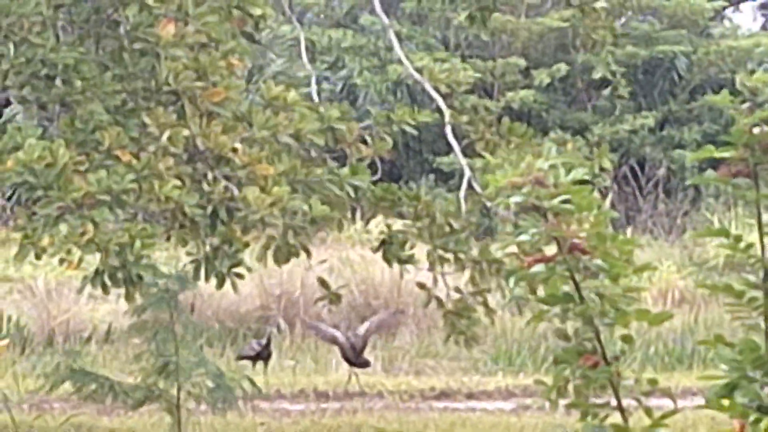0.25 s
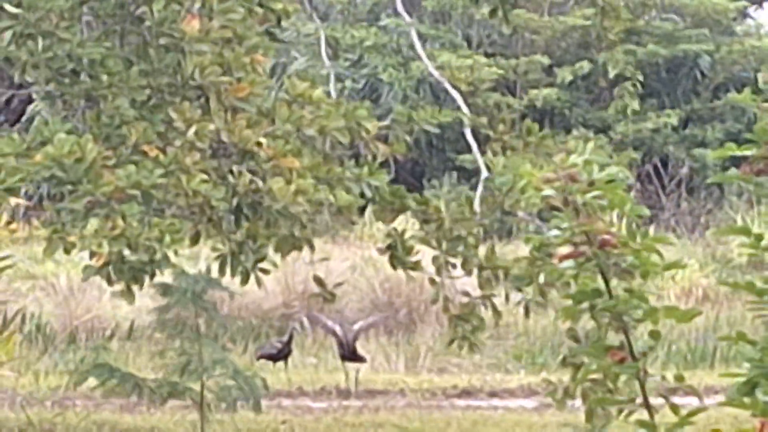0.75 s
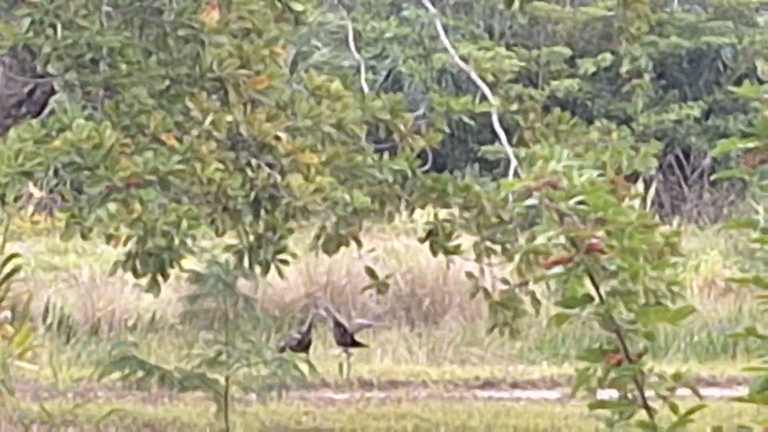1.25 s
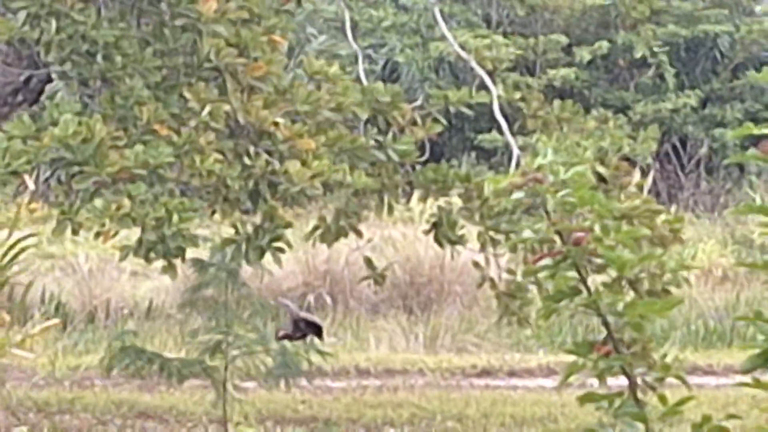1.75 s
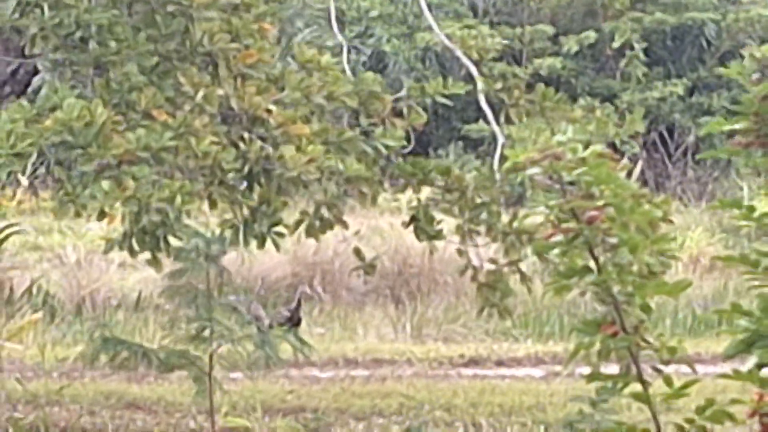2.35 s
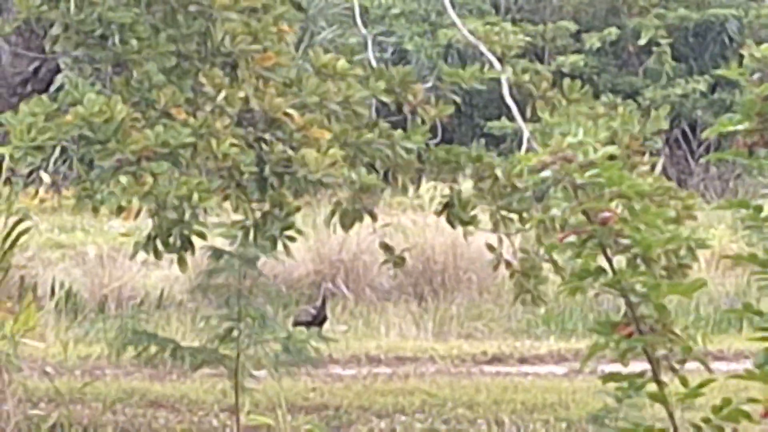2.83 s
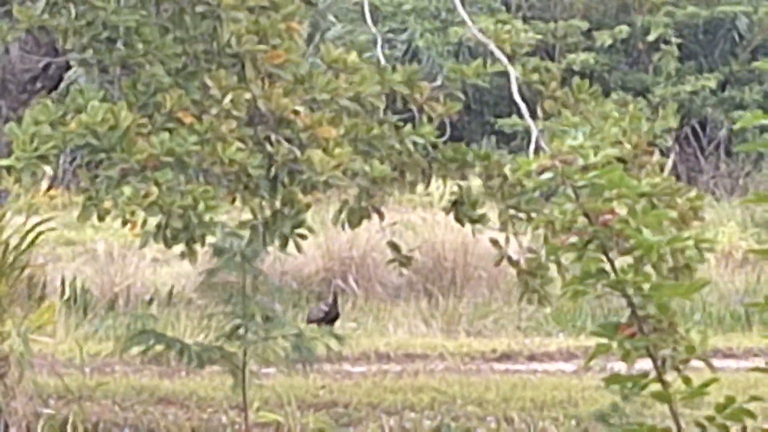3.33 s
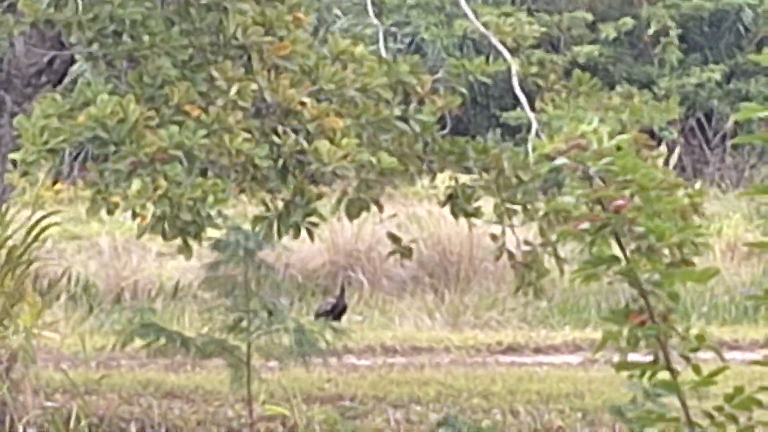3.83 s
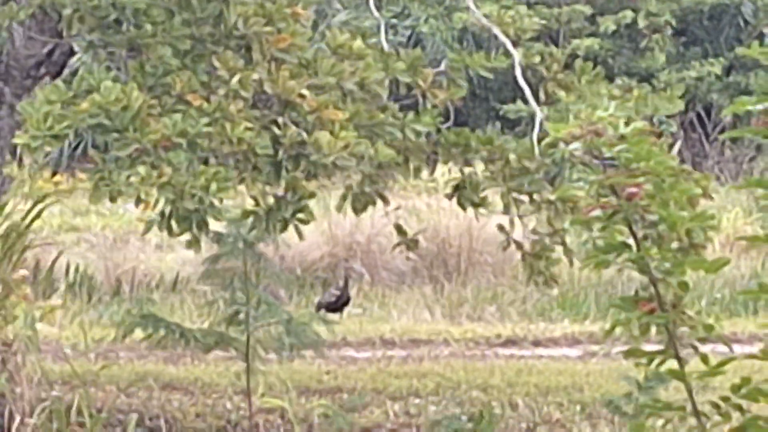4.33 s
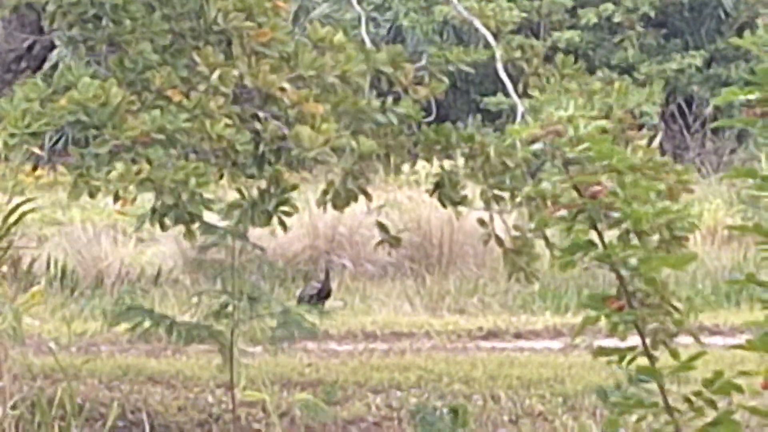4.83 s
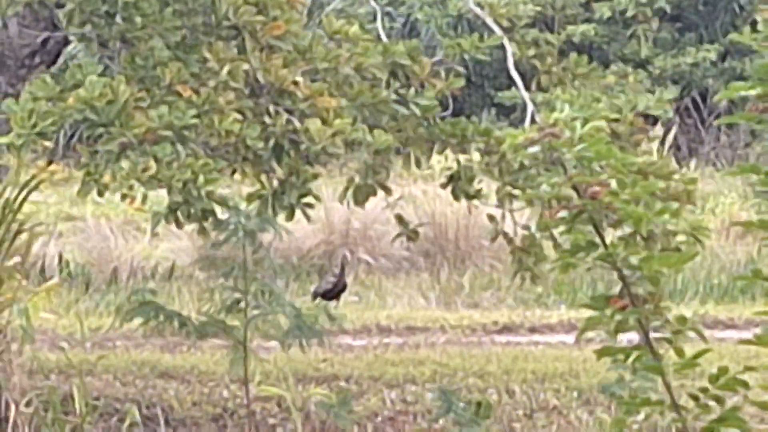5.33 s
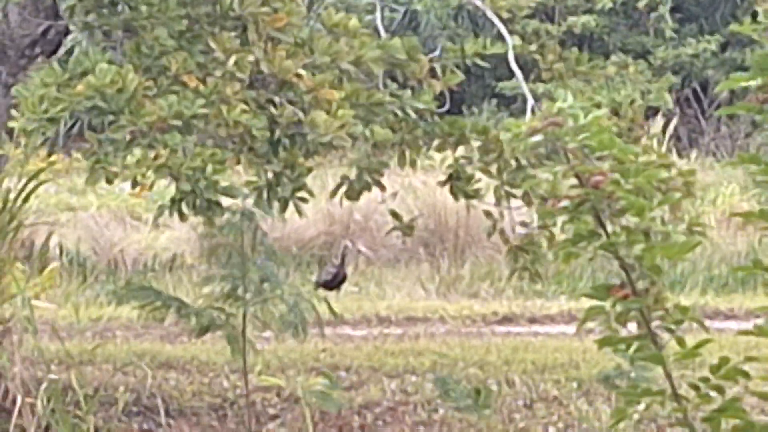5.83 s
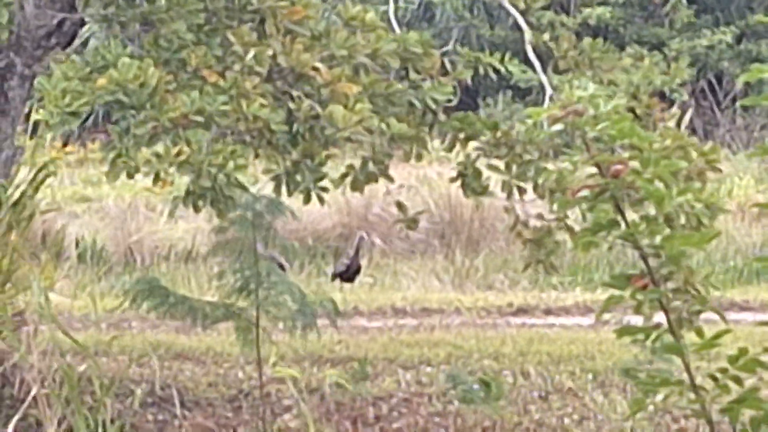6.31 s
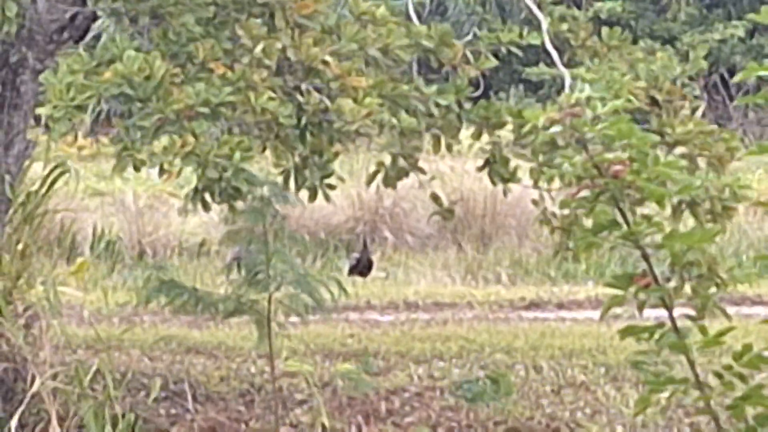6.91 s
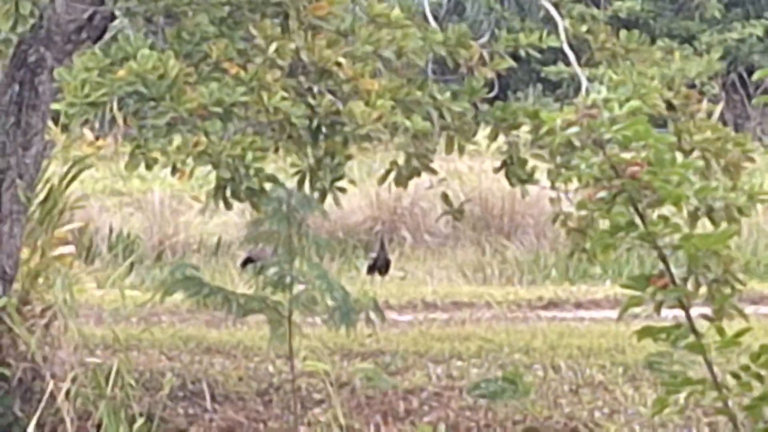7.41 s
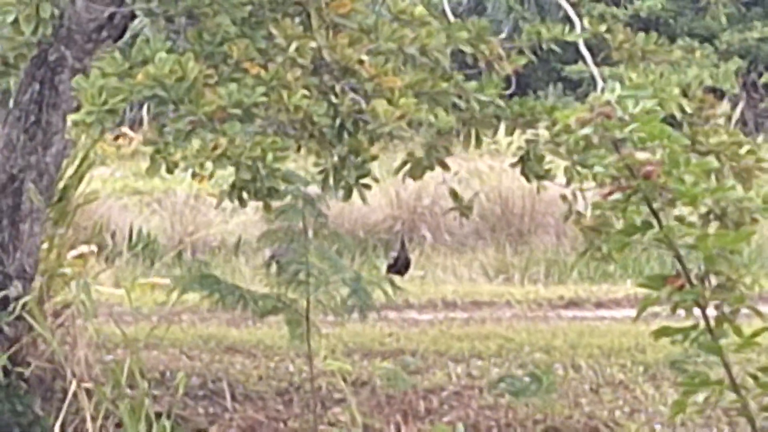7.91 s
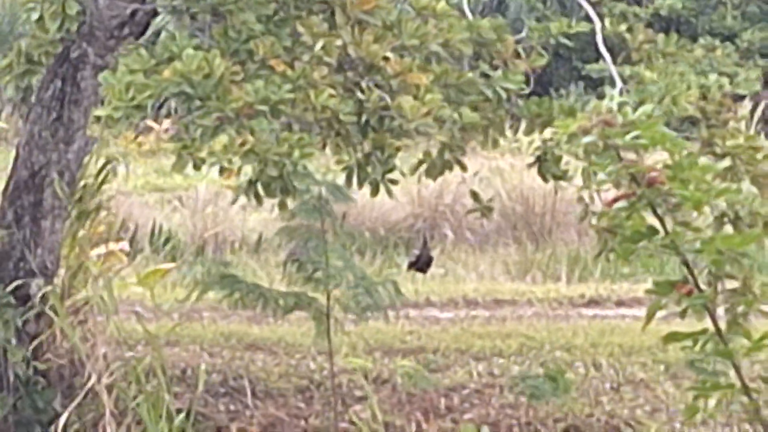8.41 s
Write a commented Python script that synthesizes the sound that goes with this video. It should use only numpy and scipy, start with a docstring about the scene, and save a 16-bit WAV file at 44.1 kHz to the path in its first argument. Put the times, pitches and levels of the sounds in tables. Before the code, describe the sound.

Two wading birds quarrel across a grassy clearing, one yelping sharply about every 0.6 seconds, the other rattling dryly, over wind rumble and distant traffic.

```python
"""Wind thumps and far traffic rumble come first; then two limpkins quarrel across a grassy clearing.
One repeats a short arched yelp, rough, then clear, then falling, and once cracks into a squawk: harmonics
filtered by a throat. The other answers with dry rattles, pulses ringing resonators, and one harmonic scream.
A small bird chips in gliding sines. Trees scatter the calls; leaves hiss as shaped noise; engines hum and
tyres whine as narrow bands of noise."""
import sys
import numpy as np
from scipy import signal
from scipy.fft import rfft, irfft
from scipy.io import wavfile
from scipy.ndimage import uniform_filter1d

SR = 44100
rng = np.random.default_rng(int(sys.argv[2]) if len(sys.argv) > 2 else 0)


def wav_record(signal):
    """Record a signal, one row per channel, as 16-bit PCM in the file named by sys.argv[1]."""
    frames = np.transpose(np.atleast_2d(signal))
    bounded = np.clip(frames, -1, 1)
    # unit amplitude maps onto the largest positive 16-bit level
    quanta = np.round(bounded * 32767).astype(np.int16)
    wavfile.write(sys.argv[1], SR, quanta)


N = 381906
TIME = np.arange(N) / SR
BINS_HZ = np.maximum(np.arange(N // 2 + 1) * SR / N, 1)


def from_db(db):
    """Decibels to amplitude gain: 20 dB is a factor of ten."""
    return 10 ** (np.asarray(db) / 20)


def rms_one(x):
    """Normalise to unit mean-square power."""
    return x / np.sqrt(np.mean(x ** 2) + 1e-20)


def in_time(rows, t):
    """Linear interpolation of every column of a curve at times t."""
    s, *columns = np.transpose(rows)
    return [np.interp(t, s, column) for column in columns]


def at_hz(points, hz):
    """Interpolation of every column of a spectrum on a log-frequency axis."""
    f, *columns = np.transpose(points)
    return np.squeeze([np.interp(np.log(hz), np.log(f), column) for column in columns])


def drift(rate_hz, size):
    """Low-pass filtering: two equal poles turn white noise into slow chance variation of RMS 1."""
    r = np.exp(-2 * np.pi * rate_hz / SR)
    run_in = int(SR / rate_hz)
    white = rng.standard_normal(size + run_in)
    return rms_one(signal.lfilter([1], [1, -2 * r, r * r], white)[run_in:])


def narrow_noise(phase, width_hz):
    """Quadrature modulation: two slow noises on sine and cosine make a unit-power band around a gliding tone."""
    in_phase = drift(width_hz, len(phase)) * np.sin(phase)
    quadrature = drift(width_hz, len(phase)) * np.cos(phase)
    return in_phase + quadrature


def resonate(x, hz, width_hz):
    """Damped resonance: a pole pair whose radius sets the bandwidth, with a peak gain of about 1."""
    r = np.exp(-np.pi * width_hz / SR)
    zeros = np.array([1, 0, -1]) * (1 - r * r) / 2
    poles = [1, -2 * r * np.cos(2 * np.pi * hz / SR), r * r]
    return signal.lfilter(zeros, poles, x)


def add(track, start_s, sound):
    """Superposition: sum a sound into a track, no earlier than its start and no later than its end."""
    i = max(int(start_s * SR), 0)
    track[i:i + len(sound)] += sound[:max(N - i, 0)]


def stereo_noise(colour):
    """Spatial coherence: mid and side noise, left and right most alike at 300-650 Hz, least in the treble."""
    # left-right likeness: f/Hz, coherence
    likeness = [(30, .25), (70, .35), (150, .62), (300, .78), (650, .79), (1300, .55), (2600, .2),
                (6000, .1), (15000, 0)]
    mid, side = rfft(rng.standard_normal((2, N)))
    alike = at_hz(likeness, BINS_HZ)
    pair = np.sqrt(1 + alike) * mid + np.sqrt(1 - alike) * side * [[1], [-1]]
    # steep skirts outside the first and last frequency of the colour
    low_hz, high_hz = colour[0][0], colour[-1][0]
    skirts = 1 / (1 + (low_hz / BINS_HZ) ** 8 + (BINS_HZ / high_hz) ** 8)
    return rms_one(irfft(pair * from_db(at_hz(colour, BINS_HZ)) * skirts, N))


def yelp_course(s, lead_s, clear_s, fall_s, entry_hz, held_hz, clear_db, rough_db, catch_db, crack, bright):
    """Register break: a rough lead-in catches, jumps into an arched clear note and drops to a growl."""
    # stages of every yelp: f/(held f), added level/dB, added rasp 0-1, added brightness/(dB per octave)
    onset = (.885, 1, .72, 4.5)
    lead_in = (.895, .5, .2, 3)
    catch = (.925, -1, .3, 3)  # pitch share first of the held, then of the entry pitch
    break_in = (1, -0.75, -0.018, 0.7)  # pitch share of the entry pitch
    hold = (1, -.6, .03, 0)
    push = (.972, 1, .08, 1.5)
    break_off = (.94, -.5, .2, 0)
    drop = (.875, 0.71, 0.1, -0.43)
    growl = (.71, 0.44, 0.83, 2.3)
    settle_share, catch_share, drop_share = 0.496, 0.665, 0.33  # shares of the lead-in, lead-in and fall
    catch_s, break_off_s = 0.0049, 0.00574  # longest jump into the clear note; time to give way to the fall
    after_catch_s = lead_s * (1 - catch_share)
    end = s + clear_s
    stages = [
        (s - lead_s, onset, held_hz, rough_db, crack, 0),
        (s - lead_s * (1 - settle_share), lead_in, held_hz, rough_db, crack, 0),
        (s - after_catch_s, catch, held_hz, rough_db - catch_db, 0, 0),
        (s - min(catch_s, after_catch_s / 2), catch, entry_hz, rough_db - catch_db, 0, 0),
        (s, break_in, entry_hz, clear_db, crack, bright),
        (s + clear_s / 3, hold, held_hz, clear_db, 0, bright),
        (s + clear_s * 2 / 3, hold, held_hz, clear_db, 0, bright),
        (end, push, held_hz, clear_db, 0, bright),
        (end + break_off_s, break_off, held_hz, rough_db, 0, 0),
        (end + fall_s * drop_share, drop, held_hz, rough_db, 0, 0),
        (end + fall_s, growl, held_hz, rough_db, 0, 0),
    ]
    return [(t, hz * share, db + lift_db, rasp + more_rasp, tilt + more_tilt)
            for t, (share, lift_db, rasp, tilt), hz, db, more_rasp, more_tilt in stages]


def cry(rows, throat, fundamental_db=0, shrill_hz=10000, shrill_db=0, edge_s=.005,
        pivot_hz=3000, tilt_top_hz=4300, loud_db=-34, bite=0.18, top_gain=0.067,
        beak_hz=4100, beak_width_hz=400, beak_gain=1.0, half_open=1.0, shrill_width_hz=1500,
        flutter_db=2.5, tremor=0.0023, air_db=-19, growl_hz=240, growl_depth=1.05):
    """Source-filter voice: syrinx harmonics sweep through a throat; rasp makes pitch and strength irregular."""
    first, last = rows[0][0], rows[-1][0]
    t = np.arange(first - edge_s, last + 2 * edge_s, 1 / SR)
    pitch, level_db, rasp, bright = uniform_filter1d(np.array(in_time(rows, t)), size=120, axis=1)
    gate = np.interp(t, [first - edge_s, first, last, last + 2 * edge_s], [0, 1, 1, 0])
    # rasp shakes the pitch and smears each harmonic into a band of noise
    chaos = np.clip(rasp, 0, 1) ** 1.5
    jitter = (tremor + .06 * chaos) * drift(330, len(t))
    smear, smear_hz = 2.4 * chaos, 500
    phase = 2 * np.pi * np.cumsum(pitch * (1 + jitter)) / SR
    # a harsh voice also comes in uneven bursts; the Bessel term holds their mean power
    growl_rate = growl_hz * (1 + 0.248 * drift(growl_hz, len(t)))
    beat = np.cos(2 * np.pi * np.cumsum(growl_rate) / SR)
    depth = growl_depth * chaos
    gate = gate * np.exp(depth * beat) / np.sqrt(np.i0(2 * depth))
    source = np.zeros(len(t))
    for k in range(1, 14):
        hz = k * pitch
        colour_db = bright * np.log2(np.minimum(hz, tilt_top_hz) / pivot_hz) + fundamental_db * (k == 1)
        # a bright call comes from a wide beak, which rings at one resonance
        opening = bright - half_open
        colour_db += beak_gain * (1 - chaos) * opening * np.exp(-((hz - beak_hz) / beak_width_hz) ** 2)
        # the top harmonics need a hard push and a wide beak, and fade first
        top_slope = bite * (level_db - loud_db) + top_gain * opening
        colour_db += top_slope * np.log2(np.maximum(hz / tilt_top_hz, 1))
        # the clear voice has a shrill resonance
        colour_db += shrill_db * (1 - chaos) * np.exp(-((hz - shrill_hz) / shrill_width_hz) ** 2)
        # the balance between harmonics wavers, and the higher ones carry more rushing air
        colour_db += flutter_db * drift(56.4, len(t))
        noisy = smear + from_db(air_db) * hz / pivot_hz
        tone = np.sqrt(2) * np.sin(k * phase)
        partial = (tone + noisy * narrow_noise(k * phase, smear_hz)) / np.hypot(1, noisy)
        source += from_db(colour_db) * partial * (hz < SR / 2)
    throat_gain = from_db(at_hz(throat, np.maximum(np.arange(SR // 2 + 1), 1)))
    voice = irfft(rfft(source * gate * from_db(level_db), SR) * throat_gain, SR)
    return t[0], voice[:len(t)]


def yelps_and_squawk():
    """Source-filter calls of the first bird: arched yelps with a register break, and one harsh squawk."""
    # yelps: break into the clear note t/s, lead-in/s, clear note/s, fall/s, entry f/Hz, held f/Hz,
    # clear drive level/dB, rough drive level/dB, cut at the catch/dB, rasp added to lead-in and break 0-1,
    # brightness/(dB per octave), lift of the fundamental/dB, shrill resonance f/Hz, its lift/dB
    yelps = [ (.509, 0.012, 0.042, 0.044, 1390, 1399, -32.5, -43, -3, 0.07, 3, -1.5, 10100, 5.5),
             (1.225, 0.055, 0.038, 0.036, 1430, 1428, -34, -41.5, 6, 0, 1, -2, 12900, 8),
             (1.874, 0.045, 0.04, 0.045, 1459, 1439, -30, -39.5, 2, 0.03, 1, -4.5, 13200, 9),
             (2.528, 0.029, 0.052, 0.045, 1404, 1404, -34, -40, -7, 0, 5, -2.5, 12900, 12.5),
             (3.125, 0.021, 0.058, 0.038, 1365, 1413, -30, -38.5, -3, 0, 0, -7.5, 10000, 1),
             (3.738, 0.042, 0.043, 0.04, 1420, 1401, -28, -36.5, 15, 0.05, -1, -8, 12600, 13),
             (4.351, 0.031, 0.038, 0.042, 1340, 1403, -32.5, -41.5, -5, 0.04, 2.5, -3, 8700, 7.5),
             (4.946, .034, .033, 0.054, 1355, 1395, -34, -41.5, 1, 0, 4, -0.5, 9700, 2),
             (5.556, 0.037, 0.027, 0.053, 1360, 1377, -30, -38, 1.5, .01, 6.5, -9.5, 13100, 11.5),
             (6.234, 0.048, 0.03, 0.053, 1368, 1373, -32.5, -39, 10, 0, 7, -4, 9900, 5),
             (7.797, 0.0061, 0.047, 0.034, 1314, 1275, -40, -39.5, 0, 0.5, -5, -10, 9500, 6), ]
    # throat and beak response: f/Hz, gain/dB
    yelp_throat = [(500, -27), (950, 4.5), (1230, 1), (1420, 2.5), (2100, -12), (2550, -8), (2770, -15.5),
                   (2860, -11), (3100, -13), (3650, -5), (3920, -18), (4180, -7.5), (4750, -14.5),
                   (5400, -13), (6150, -18.5), (6760, -7), (7100, -12.5), (7650, -14.5), (8400, -35),
                   (9700, -26), (13000, -38), (16000, -31)]
    # a grunt and a gap before a long harsh fall:
    # t/s, f/Hz, drive level/dB, rasp 0-1, brightness/(dB per octave)
    squawk_rows = [(6.898, 1206, -42, 0.76, 7), (6.903, 1297, -35.5, 0.7, 3), (6.916, 1245, -42, 0.9, 5),
                   (6.923, 1198, -64, 0.5, 3), (6.961, 1344, -64, 0.5, 3), (6.965, 1387, -29.5, 0.56, 7),
                   (6.974, 1316, -36.5, 0.47, 6), (6.986, 1290, -42, .12, 4), (7.001, 1277, -37, 0.1, 2.5),
                   (7.015, 1232, -31.5, .03, 3.5), (7.025, 1180, -40, 0.1, 5), (7.031, 1067, -36, 0.1, 5),
                   (7.039, 1026, -41, .7, -2), (7.048, 997, -34, 0.86, 3), (7.058, 910, -53, 1, 3)]
    # throat and beak response: f/Hz, gain/dB
    squawk_throat = [(500, -22), (1250, -3.5), (2000, -6), (2550, -7), (2950, -18), (3650, -2),
                     (3930, -15.5), (4230, -3), (4700, -16), (5150, -9), (5800, -13), (6300, -17.5),
                     (6900, -8), (7500, -18), (8400, -28), (9700, -24.5), (13000, -40), (16000, -34)]
    caller = np.zeros(N)
    for *course, fundamental_db, shrill_hz, shrill_db in yelps:
        add(caller, *cry(yelp_course(*course), yelp_throat, fundamental_db, shrill_hz, shrill_db))
    add(caller, *cry(squawk_rows, squawk_throat))
    return caller


def rattle_note(db, throat_hz, upper_db, pulse_hz=345, slowing=.2, unevenness=.11, snap_db=2.0,
                breath=0.034, width_hz=500, first_share=0.77, rise_s=0.012, release_s=0.016,
                beak_opens_s=0.0064, low_hz=1120, mode_wander=0.029, mode_vary_db=2):
    """Impulse excitation: uneven, slowing snaps of the syrinx ring the throat; louder croaks last longer."""
    # throat resonances: f/Hz, width of one of two passes/Hz, gain/dB; f and gain vary by croak
    rattle_modes = [(1260, 130, 2.5), (2020, 200, -9), (2450, 200, -14), (3280, 340, -8), (3680, 280, -7),
                    (4100, 260, -7), (6000, 2200, -29)]
    length_s = .029 * 2 ** ((db + 34) / 44.5)  # 29 ms at -34 dB, doubling for every 44.5 dB more
    t = np.arange(int(length_s * SR)) / SR
    rate = pulse_hz * rng.uniform(.78, 1.2) * (1 - slowing * (t / length_s - .5))
    cycles = np.cumsum(rate * (1 + unevenness * drift(pulse_hz, len(t)))) / SR
    # one snap each time the running count passes a whole number
    snaps = np.diff(np.floor(cycles), prepend=-1) * from_db(snap_db * rng.standard_normal(len(t)))
    source = snaps + breath * rng.standard_normal(len(t))
    # the main resonance acts twice, which leaves a deep valley above it
    voice = resonate(resonate(source, throat_hz, width_hz), throat_hz, width_hz)
    # the other resonances come in as the beak opens
    beak = np.minimum(t / beak_opens_s, 1)
    for hz, width, mode_db in rattle_modes:
        hz = hz * (1 + mode_wander * rng.standard_normal())
        mode_db = mode_db + mode_vary_db * rng.standard_normal()
        ringing = resonate(resonate(source, hz, width), hz, width)
        voice = voice + beak * from_db(mode_db + upper_db) * ringing
    voice = signal.sosfilt(signal.butter(6, low_hz, "high", fs=SR, output="sos"), voice)
    # the first snap is nearly at full strength
    swell = np.interp(t, [0, rise_s], [first_share, 1])
    release = np.minimum((length_s - t) / release_s, 1)
    return from_db(db) * rms_one(voice) * swell * release


def rattles_and_scream():
    """Pulsed and harmonic excitation of the rival's throat: runs of dry croaks and one scream."""
    # croaks: t/s, level before swell and release/dB, throat resonance f/Hz, upper resonances gain/dB
    croaks = [ (1.046, -46, 1600, -7), (1.094, -40, 1650, -10), (1.139, -35, 1600, -5),
              (1.266, -31, 1770, -0.5), (1.292, -38, 1610, 5), (1.321, -44, 1400, 9),
              (2.214, -45, 1820, -14), (2.255, -38, 1750, -8), (2.298, -35, 1700, -5),
              (2.341, -33, 1720, -3), (2.38, -37.5, 1540, -5), (2.419, -46, 1450, 6),
              (3.218, -39.5, 1730, 7), (3.26, -37.5, 1730, 0), (3.301, -34, 1610, -3.5),
              (3.344, -36, 1520, -4), (3.39, -45, 1450, 4), (4.19, -48, 1740, -5), (4.231, -43, 1660, -12),
              (4.271, -41, 1690, -5), (4.308, -36.5, 1530, -9), (4.322, -37, 1800, -4),
              (4.352, -36, 1650, -10), (4.39, -40.5, 1500, 4), (5.293, -44, 1700, -1),
              (5.329, -42, 1700, 2), (5.368, -36.5, 1500, 4), (5.405, -40.5, 1480, 1),
              (5.446, -46, 1400, 9), (6.344, -44.5, 1590, 6), (6.389, -41, 1650, 4),
              (6.427, -35.5, 1430, 1), (6.467, -38, 1460, 9), (6.511, -46, 1400, 7), (7.21, -45, 1540, -9),
              (7.252, -42, 1630, -4), (7.291, -37.5, 1690, -0.5), (7.33, -30.5, 1560, -1.5),
              (7.372, -32.5, 1540, -0.5), (7.415, -40, 1330, -5), (7.46, -47.5, 1350, 11),
              (8.171, -44, 1640, -11), (8.218, -44.5, 1650, -5), (8.263, -39, 1530, -7),
              (8.302, -36, 1530, -7.5), (8.342, -39, 1480, -7), (8.38, -45.5, 1400, -2), ]
    # scream: t/s, f/Hz, drive level/dB, rasp 0-1, brightness/(dB per octave)
    scream_rows = [(1.174, 2000, -43, .4, 7), (1.188, 1803, -36, .35, 8), (1.196, 1704, -27.5, 0.32, -15),
                   (1.207, 1600, -24.5, 0.3, 3), (1.216, 1553, -38, 0.25, -8), (1.231, 1597, -44, .3, -6),
                   (1.238, 1626, -24, 0.1, 1), (1.249, 1557, -26, 0.2, 2), (1.257, 1434, -25, 0.15, -16),
                   (1.263, 1370, -35, 0.3, -4)]
    # throat and beak response: f/Hz, gain/dB
    scream_throat = [(500, -30), (1000, -20), (1650, -7.5), (1950, -12), (2400, -20), (3200, -8.5),
                     (4200, -22), (5200, -34), (9000, -43), (16000, -47)]
    rival = np.zeros(N)
    add(rival, *cry(scream_rows, scream_throat))
    for s, *croak in croaks:
        add(rival, s, rattle_note(*croak))
    return rival


def bush(x, scatter_db=-7, delay_s=.02, spread_s=0.011, centre_hz=1720, width_hz=450):
    """Multiple scattering: nearby branches return a dull, smeared copy that fills the gaps between croaks."""
    t = TIME[:SR // 10]
    response = rng.standard_normal(len(t)) * np.exp(-.5 * ((t - delay_s) / spread_s) ** 2)
    response = response / np.linalg.norm(response)
    return from_db(scatter_db) * signal.fftconvolve(resonate(x, centre_hz, width_hz), response)[:N]


def limpkins():
    """Superposition of both birds; only the rival's calls are scattered by a bush beside it."""
    rival = rattles_and_scream()
    return yelps_and_squawk() + rival + bush(rival)


def small_bird(waver=0.016, buzzy_hz=7800, fade_s=0.017):
    """Frequency modulation: gliding sines whose random waver grows with pitch, so low notes stay smooth."""
    # chips and whistles: t/s, length/s, start f/Hz, middle f/Hz, end f/Hz, level before fades/dB
    chips = [(1.462, .043, 7100, 7350, 7600, -56), (1.592, 0.037, 8050, 7720, 7400, -55),
             (3.266, 0.067, 7900, 7650, 7500, -49.5), (3.356, .05, 8600, 8000, 7500, -54),
             (5.225, .11, 2680, 2865, 2670, -56), (7.945, .11, 3640, 3600, 3510, -60),
             (8.552, .04, 8200, 7900, 7750, -58)]
    out = np.zeros(N)
    for s, length, *course_hz, db in chips:
        t = np.arange(int(length * SR)) / SR
        hz = np.polyval(np.polyfit([0, length / 2, length], course_hz, 2), t)
        hz = hz * (1 + waver * (hz / buzzy_hz) ** 2 * drift(300, len(t)))
        fade = np.minimum(np.minimum(t, length - t) / fade_s, 1)
        tone = np.sqrt(2) * np.sin(2 * np.pi * np.cumsum(hz) / SR)
        add(out, s, from_db(db) * fade * tone)
    return out


def clearing(x, near_db=-13, near_t60=0.28, faint_db=-19, faint_t60=0.18,
             echo_db=-23, echo_s=0.1, echo_spread_s=0.069):
    """Convolution: direct sound plus two decaying scatters and a smeared echo from the tree line."""
    # arrival at the two microphones: f/Hz, left-right level/dB, left phase lead/rad
    arrival = [(1100, 0, -.3), (1420, 0, .9), (2000, 0, .7), (2800, 5, -2.0), (3600, -1, -.8),
               (4200, -3, 1.0), (5500, 4, 2.3), (6900, 1, -1.0), (9700, -2, .5), (14000, -5, -1.5)]
    # colour of the scattered sound: f/Hz, gain/dB
    tree_colour = [(800, 16), (1400, 5), (2800, 5.5), (3600, 9), (4150, 7), (5500, 8), (7200, 0),
                   (10000, -16), (16000, -21)]
    balance_db, lead = at_hz(arrival, BINS_HZ)
    sides = np.array([[.5], [-.5]])
    direct = irfft(rfft(x) * from_db(sides * balance_db) * np.exp(1j * sides * lead), N)
    t = TIME[:SR]
    shapes = [
        (near_db, from_db(-60 * t / near_t60)),
        (faint_db, from_db(-60 * t / faint_t60)),
        (echo_db, np.exp(-.5 * ((t - echo_s) / echo_spread_s) ** 2)),
    ]
    response = np.zeros((2, SR))
    for db, shape in shapes:
        response += from_db(db) * shape / np.linalg.norm(shape) * rng.standard_normal((2, SR))
    coloured = irfft(rfft(x) * from_db(at_hz(tree_colour, BINS_HZ)), N)
    return direct + signal.fftconvolve(coloured[None], response, axes=1)[:, :N]


def buffets(low_hz=48, high_hz=125, shared=1.0):
    """Turbulent pressure: eddies thump the microphone ports, partly together and partly each on its own."""
    # buffets: centre t/s, length/s, level before the window/dB
    thumps = [(0.361, 0.19, -34.5), (0.521, 0.059, -26), (0.708, 0.13, -27), (0.817, 0.082, -27),
              (0.947, 0.059, -28), (1.628, 0.069, -27), (2.333, 0.078, -22.5), (2.774, 0.074, -29.5),
              (3.169, .16, -42), (4.138, 0.16, -33), (4.403, 0.1, -23.5), (4.956, 0.12, -36)]
    out = np.zeros((2, N))
    band = signal.butter(2, [low_hz, high_hz], "band", fs=SR, output="sos")
    for s, length, db in thumps:
        n = int(length * SR)
        both, *own = signal.sosfilt(band, rng.standard_normal((3, SR)))[:, -n:]
        for track, eddy in zip(out, own):
            add(track, s - length / 2, from_db(db) * np.hanning(n) * rms_one(shared * both + eddy))
    return out


def wind(lumps_db=3.0, lumps_hz=9):
    """Turbulent noise: a bass rumble whose level wavers at random, making it lumpy."""
    # level before the lumps: t/s, level/dB
    course = [(0, -33.5), (.9, -32.5), (1.2, -40.5), (2.0, -37), (2.6, -38), (3.0, -35.5), (3.2, -32),
              (3.7, -36), (3.95, -39), (4.3, -32.5), (4.8, -35.5), (6.2, -36), (7.2, -39.5), (8.66, -38)]
    # spectrum: f/Hz, relative density/dB
    colour = [(22, -15), (36, -8), (50, 2.5), (63, 1), (80, 3.5), (110, -2.5), (150, -7), (200, -11.5),
              (260, -15.5), (380, -20.5)]
    lumps_course_db = lumps_db * drift(lumps_hz, N)
    return from_db(in_time(course, TIME)[0] + lumps_course_db) * stereo_noise(colour)


def traffic(trim_db=-0.96, swell_db=0.91, swell_hz=3):
    """Incoherent sum of far sources: a coloured noise wash with a gently wavering level."""
    # level before trim and swell: t/s, level/dB
    course = [(0, -37.5), (.45, -35), (1.0, -37), (2.3, -39.5), (2.8, -38), (3.6, -37), (4.1, -41.5),
              (6.0, -40), (7.5, -42), (8.66, -43.5)]
    # spectrum: f/Hz, relative density/dB
    colour = [(160, 4), (250, 2.5), (340, -6), (420, -3.5), (510, 3.5), (660, 2), (800, -3.5), (1050, -4.5),
              (1400, -11.5), (1900, -15.5), (2600, -33.5), (4000, -30)]
    swell_course_db = swell_db * drift(swell_hz, N)
    return from_db(in_time(course, TIME)[0] + trim_db + swell_course_db) * stereo_noise(colour)


def vehicles(engine_width_hz=2.72, tyre_width_hz=25, fade_s=0.14, swell_db=10):
    """Narrow-band noise: engines hum in thin lines, tyres whine in broader ones; each swells, glides and fades."""
    # engine tones: start t/s (negative starts at 0), rise/s, fall/s, start f/Hz, end f/Hz, peak level/dB
    engine_tones = [(-0.1, 0.73, 0.6, 192, 190, -40), (3.5, 0.38, 0.957, 195.5, 180, -45),
                    (4.5, 1.5, 1.21, 190, 200, -43), (3.5, 3, 3.87, 123, 110, -44.5),
                    (2.5, 3, 6.7, 62.2, 62.6, -40), (0, 0.39, 12.9, 504, 504.6, -53.5)]
    # tyre whines: same columns
    tyre_whines = [(.15, 0.21, 0.456, 535, 517, -35.5), (0.62, 0.397, 1.2, 390, 475, -56),
                   (.1, 0.264, 0.6, 706, 740, -40.5), (0.87, 0.598, 1.1, 675, 640, -41.5),
                   (2.6, 1.2, 0.49, 635, 600, -46)]
    out = np.zeros(N)
    for tones, width_hz in [(engine_tones, engine_width_hz), (tyre_whines, tyre_width_hz)]:
        for s, rise_s, fall_s, start_hz, end_hz, peak_db in tones:
            t = np.arange(0, rise_s + fall_s, 1 / SR)
            hz = np.linspace(start_hz, end_hz, len(t))
            level_db = peak_db - swell_db * np.interp(t, [0, rise_s, t[-1]], [1, 0, 1])
            fade = np.minimum(np.minimum(t, t[-1] - t) / fade_s, 1)
            line = narrow_noise(2 * np.pi * np.cumsum(hz) / SR, width_hz)
            add(out, s, fade * from_db(level_db) * line)
    return out


def leaves(trim_db=2.5, pan_db=-0.3):
    """Broadband noise: the hiss of foliage, slightly stronger on the right."""
    # level before trim and pan: t/s, level/dB
    course = [(0, -54.5), (.8, -53), (6.5, -51.5), (8.66, -53.5)]
    # spectrum: f/Hz, relative density/dB
    colour = [(1500, 11.5), (2800, 1), (4200, 4), (5500, 1), (7500, 2), (8600, -3.5), (10500, -5),
              (13000, -3.5), (16000, 2)]
    pan = from_db([[pan_db], [-pan_db]])
    return from_db(in_time(course, TIME)[0] + trim_db) * stereo_noise(colour) * pan


def scene():
    """Superposition of the birds in the clearing and the background."""
    birds = clearing(limpkins() + small_bird())
    return birds + buffets() + wind() + traffic() + vehicles() + leaves()


def record(dry):
    """Band limiting: the recorder cuts the top steeply."""
    cutoff_hz = 15850
    return irfft(rfft(dry) / (1 + (BINS_HZ / cutoff_hz) ** 400), N)


dry = scene()
out = record(dry)
wav_record(out)
```